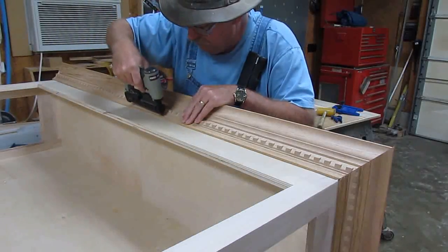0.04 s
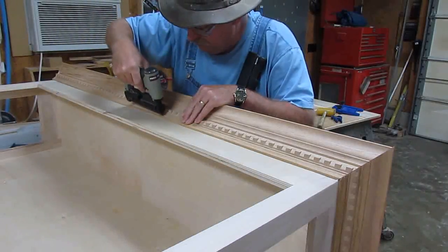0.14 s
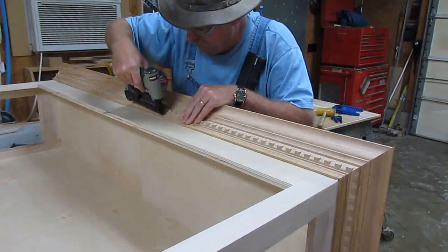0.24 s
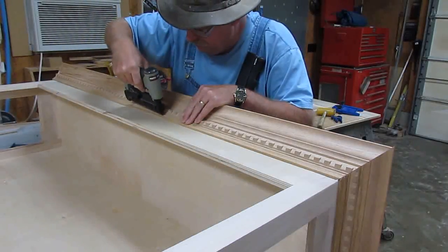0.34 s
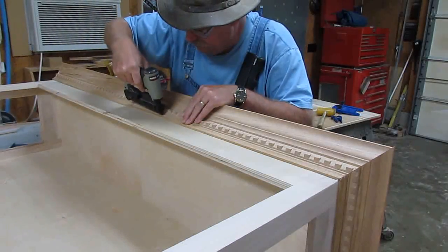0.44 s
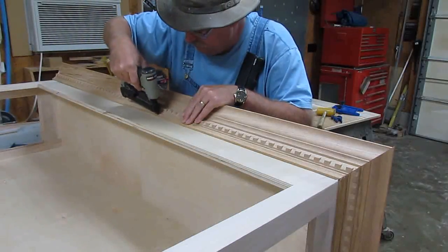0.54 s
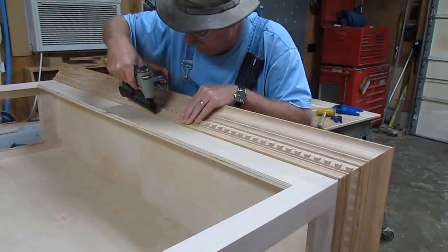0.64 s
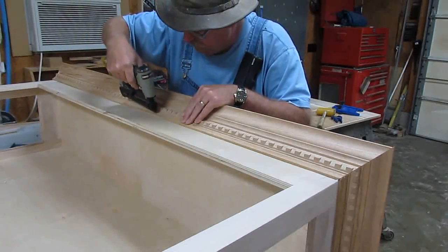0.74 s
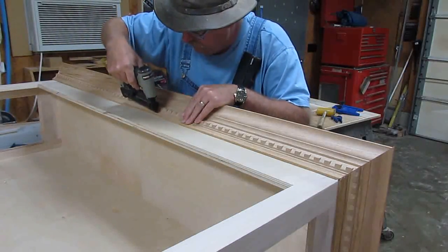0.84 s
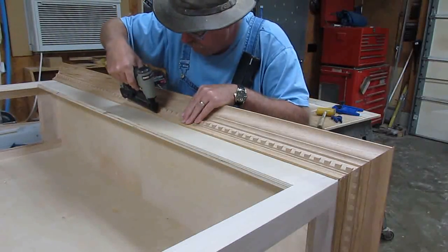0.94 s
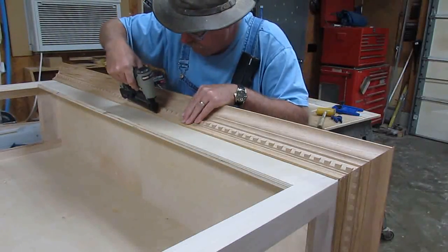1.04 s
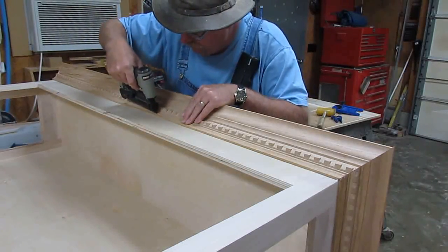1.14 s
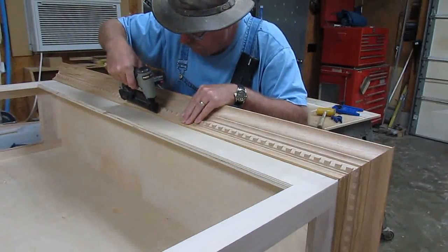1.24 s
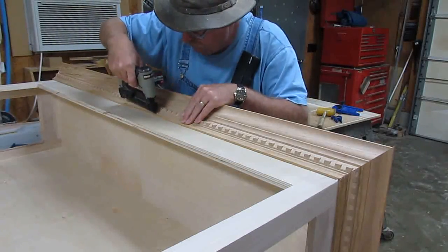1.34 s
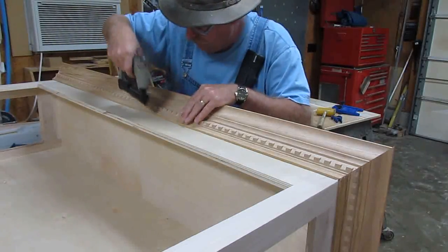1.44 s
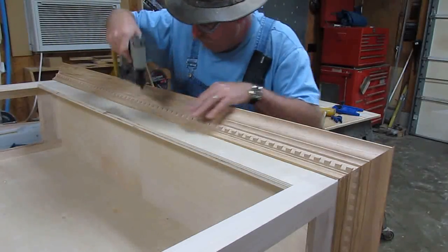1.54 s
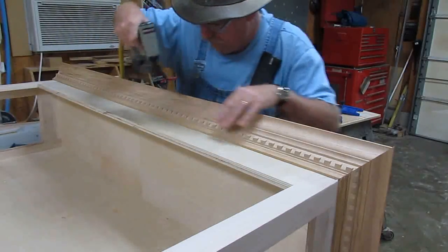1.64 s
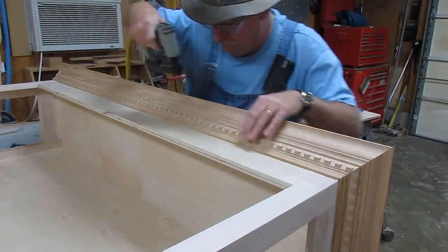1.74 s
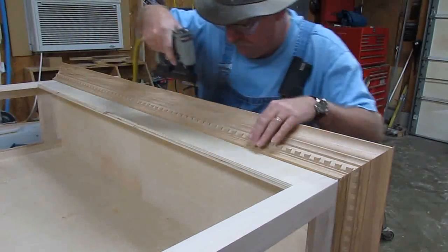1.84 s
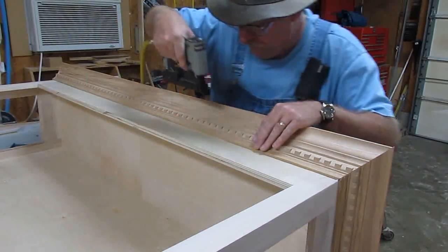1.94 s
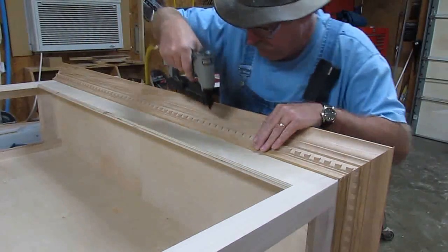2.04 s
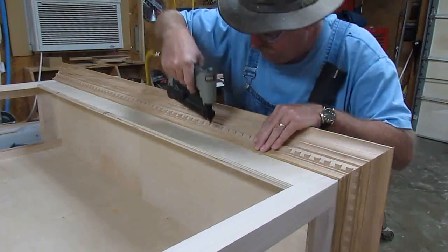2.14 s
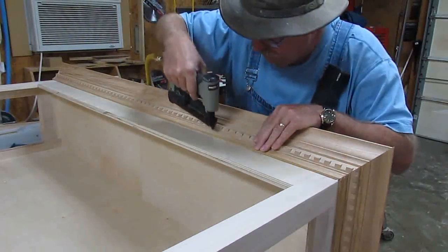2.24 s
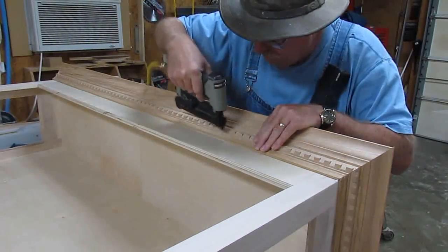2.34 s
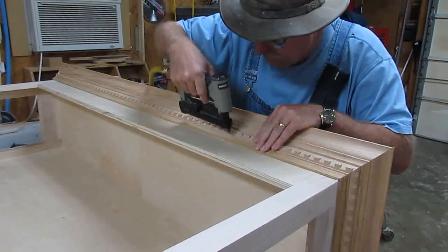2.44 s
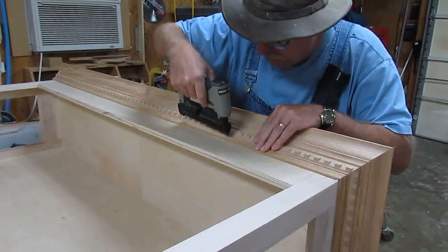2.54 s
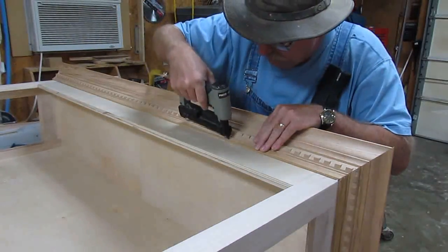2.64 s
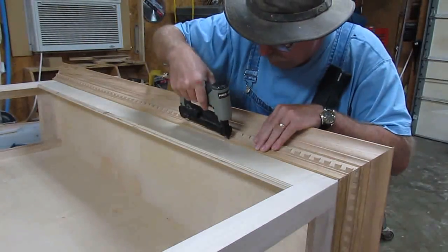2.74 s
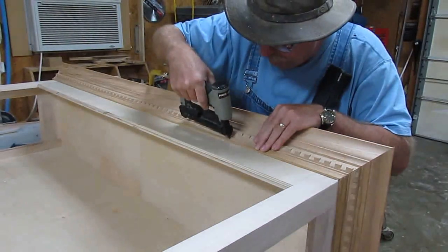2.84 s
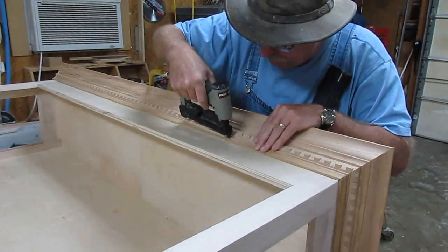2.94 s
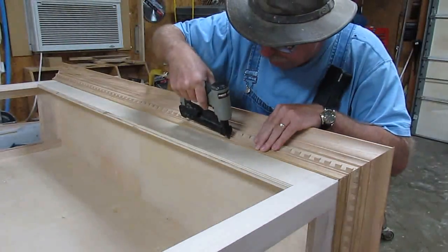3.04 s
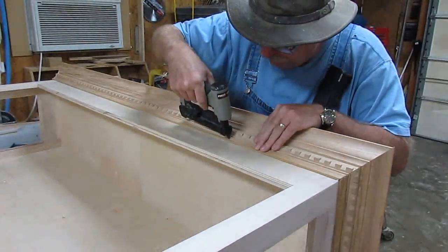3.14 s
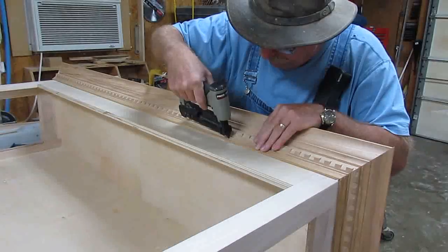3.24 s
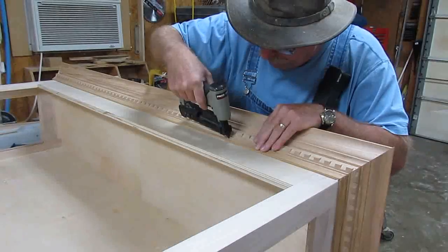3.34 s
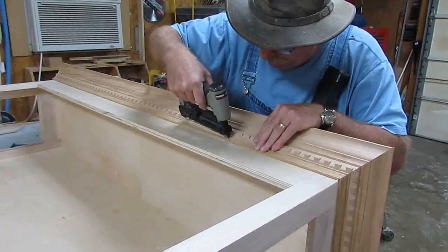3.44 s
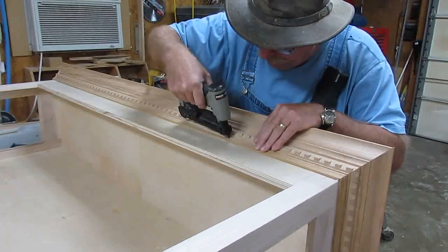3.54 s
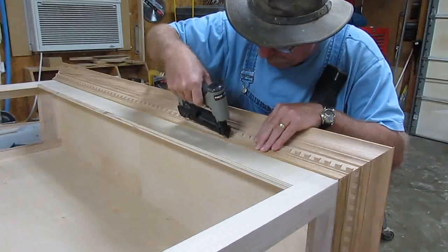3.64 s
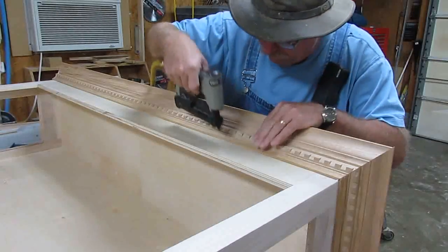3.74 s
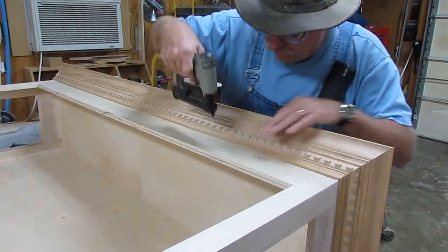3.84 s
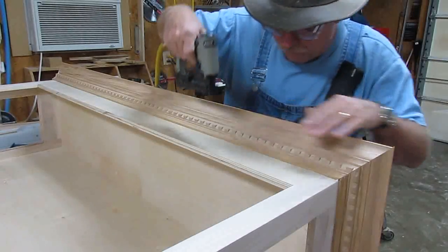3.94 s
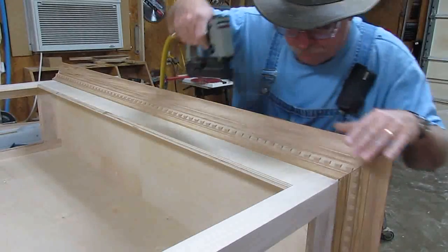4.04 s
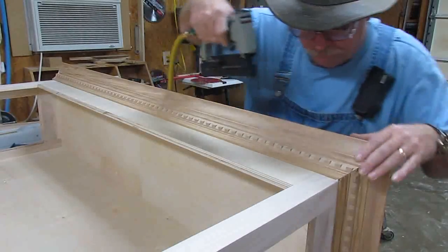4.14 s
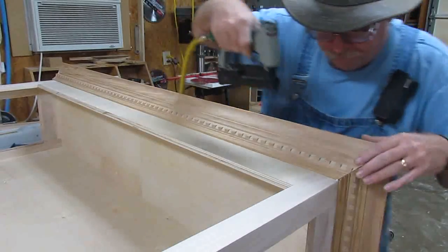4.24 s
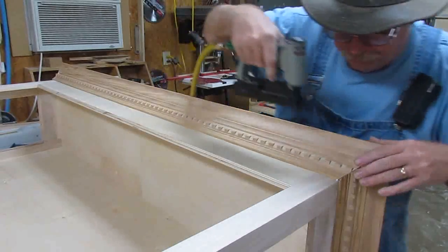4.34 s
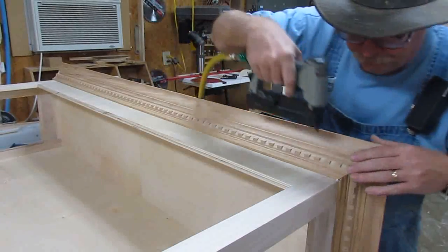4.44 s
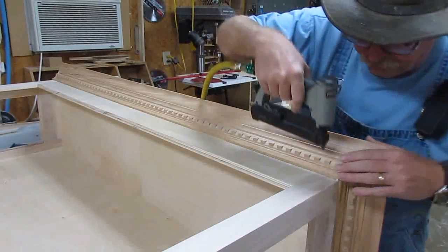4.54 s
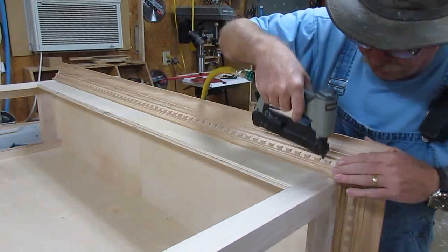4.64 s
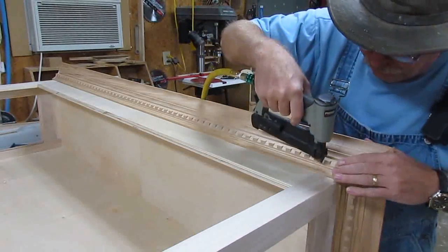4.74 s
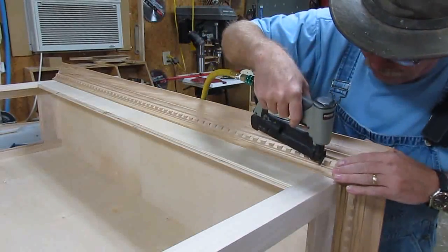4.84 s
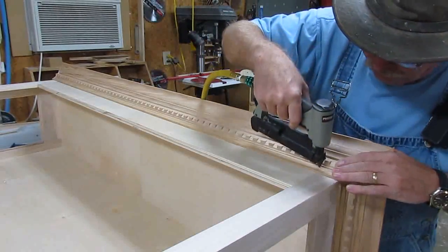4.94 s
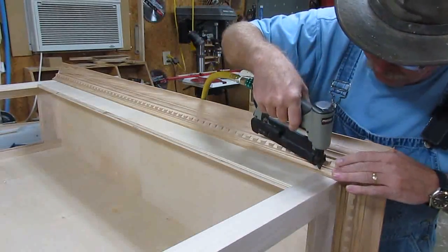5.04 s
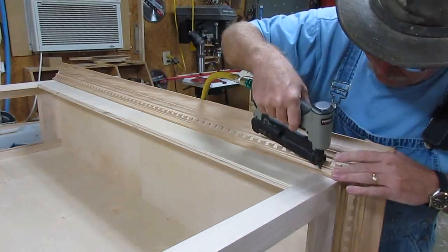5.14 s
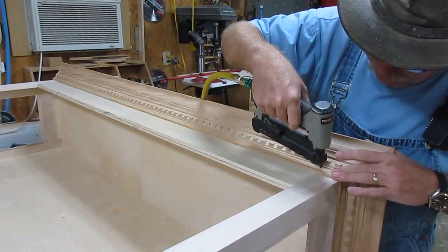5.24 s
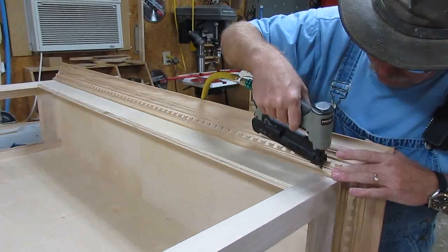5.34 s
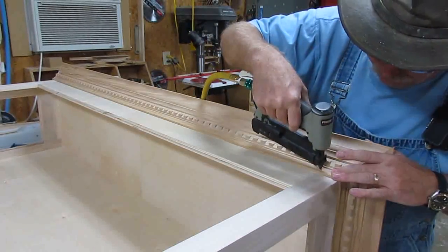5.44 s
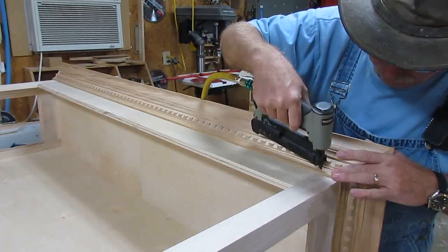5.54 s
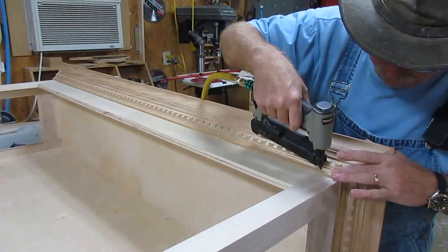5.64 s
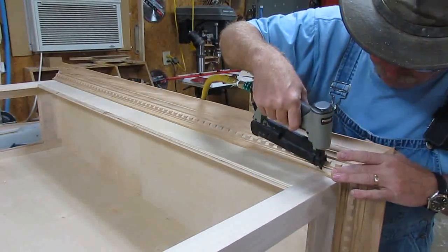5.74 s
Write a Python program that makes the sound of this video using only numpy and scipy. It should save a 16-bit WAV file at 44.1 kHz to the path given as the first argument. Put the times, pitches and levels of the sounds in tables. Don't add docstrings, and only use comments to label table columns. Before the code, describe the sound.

A compressed-air pin nailer fires three sharp, clanking shots into a hollow wooden cabinet, with scrapes, knocks and hand sweeps in an echoing workshop.

```python
import sys
import numpy as np
from scipy import signal
from scipy.fft import rfft, irfft
from scipy.io import wavfile
from scipy.ndimage import uniform_filter1d

SR = 44100
rng = np.random.default_rng(int(sys.argv[2]) if len(sys.argv) > 2 else 0)


def int16_out(signal):
    q = np.round(np.clip(np.atleast_2d(signal).T, -1, 1) * 32767)
    wavfile.write(sys.argv[1], SR, q.astype(np.int16))


def volts_from_db(level):
    exponent = np.asarray(level, float) / 20
    return 10 ** exponent


N = 255320

# [f/Hz, level/dB]
FLOOR_TONE = [(15, -46), (25, -15.5), (70, 2), (229, 0.5), (439, -4.5), (1160, -6), (1290, -10),
              (1740, -8.5), (2350, -12), (7310, -15.5), (12900, -22.5), (14800, -32.5), (16000, -49)]
# [f/Hz, level/dB rms]
VENT_WHINE = [(1557, -78.5)]
# [f/Hz, t60/s]
SHOP_T60 = [(100, 0.71), (260, .73), (700, 0.75), (1840, 0.75), (4850, 0.73), (9000, 0.49), (12800, 0.42),
            (16000, 0.9)]
# [f/Hz, level/dB]
SHOP_TONE = [(60, 4.5), (250, 7), (1000, 0), (4000, 6), (8000, -1), (15000, -0.5)]
# [f/Hz, likeness/0..1]
DIFFUSE = [(25, .5), (60, 1), (150, 0.62), (500, 0.54), (1500, 0.46), (4000, .15), (12000, 0.037)]
# [t/s, level/dB, tilt/steps of 6 dB off the part below 3 kHz, held to
SWEEPS = [
    [(0.64, -61, 0.1), (0.674, -72, 4), (0.714, -57, 6), (1.094, -70, 2), (1.106, -85, 5), (1.11, -81, 2)],
    [(1.76, -67, 6), (1.786, -75, 1), (1.796, -51.5, 4.5), (1.824, -57, 6), (1.938, -59.5, 7),
     (1.99, -44, 1.7), (2.148, -41.5, 0.3), (2.296, -55, 0.1), (2.478, -59.5, 3), (2.528, -76, 0.1),
     (2.56, -96, 9)],
    [(2.63, -83, 6), (2.698, -78, 4), (2.75, -63.5, 0.5), (2.816, -61, 9), (2.87, -78, -5.5)],
    [(3.92, -62, 5.8), (4.062, -69.5, -1.3), (4.122, -59.5, -2), (4.156, -75, 7), (4.23, -58, 9),
     (4.266, -63, 1), (4.368, -45, 0), (4.45, -40.5, 0.16), (4.56, -61.5, -2.16), (4.782, -68, -0.1),
     (4.814, -65, -1.6), (5.032, -67, -0.5), (5.042, -80, 1.7), (5.15, -82.5, 1.7)],
]
# [f/Hz, level/dB per Hz]
SWEEP_TONE = [(290, -33.5), (500, -28), (901, -8.5), (1350, -9), (3190, -4.5), (6450, -5), (12700, -16),
              (14400, -20), (15500, -54)]
# [t/s, level/dB, squeak of the tip above that/dB]
DRAGS = [
    [(0.05, -78, 1), (0.072, -51.5, -28), (0.104, -86, -17), (0.128, -60, -29), (0.288, -71, -7),
     (0.304, -60.5, -25), (0.32, -69, -8), (0.37, -57.5, -6.5)],
    [(0.37, -57, -3.5), (0.388, -48, -7.5), (0.43, -45, -13), (0.47, -57, -10)],
    [(0.47, -52.5, -12.5), (0.502, -53, 0), (0.592, -60.5, -4.5), (0.636, -51.5, 3.5), (0.652, -53, -8.5),
     (0.716, -64.5, -6.5), (0.75, -62.5, -4.5)],
    [(0.75, -61, -9), (0.808, -70, -2.5), (0.82, -54.5, -11), (0.844, -58, -10.5), (0.888, -60, -7),
     (0.898, -60, -19.5), (0.926, -64.5, -2), (1.11, -63, -10.5)],
]
# [f/Hz, level/dB per Hz]
DRAG_TONE = [(300, -15), (700, -6), (1000, 0), (1600, -1), (2100, -13), (5000, -21), (14000, -35)]
# [f/Hz, level/dB per Hz]
TIP_TONE = [(1200, -22.5), (2000, -4), (2500, 0), (3200, -4), (4500, -8), (14000, -23)]
# [t/s, level/dB, best-struck f/Hz,
# spread/octaves]
KNOCKS = [(0.063, -42, 248, 2.2), (0.096, -37.5, 200, 1.1), (.135, -33.5, 580, .22),
          (0.164, -43, 200, 0.91), (.205, -45, 243, 0.98), (0.446, -44.5, 88, 0.41),
          (.555, -46.5, 69, 0.66), (.53, -49.5, 326, .6), (.61, -47.5, 290, 0.46),
          (0.683, -47.5, 287, 0.91), (.818, -44.5, 130, 1.3), (.845, -44.5, 240, 0.83),
          (1.126, -38.5, 40.7, .7), (1.130, -26.5, 750, 1.3), (1.138, -33.5, 226, 0.62),
          (1.267, -42.5, 178.5, 1.1), (2.582, -44, 303, 1.23), (2.626, -50, 199, 0.93),
          (2.682, -43, 95, 0.75), (2.890, -45, 500, 1.9), (2.905, -31, 230, .6), (2.958, -42, 102.6, .9),
          (3.245, -51, 90.5, .6), (3.445, -39, 44.95, 0.77), (3.446, -29.5, 325, 0.96),
          (3.547, -32, 333, .6), (3.59, -27.5, 327, 0.49), (3.986, -50, 282, 1.8), (4.081, -47.5, 100, 1.1),
          (4.646, -50.5, 200, 1.38), (4.675, -50.5, 222, 0.83), (4.718, -45, 95.6, 0.37),
          (5.298, -41, 500, 2.15), (5.307, -33, 191, 0.71), (5.335, -36, 110, .9), (5.37, -45, 95, 0.5),
          (5.596, -33, 236.7, 1), (5.735, -37, 250, 1.1)]
# [f/Hz, level/dB, t60/s]
PANEL_MODES = [(33.18, -9.5, .1), (52, -22, 0.36), (94.6, -5, .22), (110, -7.5, .2), (144.4, -2, 0.16),
               (190.2, -9.5, .25), (215.8, -5.5, .3), (244, -5.5, 0.18), (259.8, -2.5, 0.11),
               (290, -4.5, 0.14), (341.1, -5, 0.17), (406.8, -10.5, 0.16), (490.4, -9, .2), (580, -5, 0.14),
               (682, -6.5, .15), (732, -8.5, 0.26), (860.7, -3.5, 0.087), (1147, -2.5, 0.052),
               (1260, -6, 0.027), (1620, -14, .06), (2050, -13, .05), (2650, -13, .04)]
# [t/s, level/dB]
LEANS = [
    [(0.0, -66), (0.03, -66), (0.068, -34), (0.132, -32.5), (0.314, -45.5), (0.676, -42), (0.782, -46),
     (0.84, -41), (1.0, -49), (1.09, -50), (1.11, -44)],
    [(1.75, -63), (1.782, -78), (2.016, -76), (2.152, -75), (2.46, -49.5), (2.54, -78.5), (2.586, -39),
     (2.714, -39.5), (2.764, -51), (2.862, -58), (2.91, -38), (3.078, -46.5), (3.396, -50.5),
     (3.414, -70.5), (3.43, -52)],
    [(3.93, -76), (3.952, -84.5), (3.988, -44.5), (4.304, -54.5), (4.522, -77), (4.66, -49), (4.76, -52),
     (4.792, -71), (5.09, -56), (5.122, -55), (5.272, -61.5), (5.294, -45.5), (5.308, -38), (5.556, -54.5),
     (5.57, -56)],
]
# [t/s, air level/dB, metal level/dB, wood level/dB, decay/ms]
BLASTS = [(1.1243, -1.5, -8, -16, 3.4), (1.1298, 4.5, -3, -21, 1.5), (1.1332, -15, -19, -9, 3.0),
          (1.139, -11, -24, -31, 3.0), (3.4446, -9, -15, -6, 2.3), (3.445, 1.5, -56, -33, 3.0),
          (3.450, -10, -19.5, -22, 2.2), (3.452, -6.5, -11.5, -23, 4.4), (3.4757, -39.5, -35.5, -55.5, 3.4),
          (5.586, -10, -41, -36.5, 4.5), (5.589, -7.5, -30.5, -52, 6.2), (5.5931, -4, -20, -17.5, 3.3),
          (5.5991, -16, -9, -21.5, 4.0)]
# [t/s, level/dB]
RELEASES = [
    (1.2621, -2.5),
    (3.546, -2.5),
    (5.735, 0.),
]
# [delay t/s, air level/dB, metal level/dB, wood level/dB, decay/ms]
RESET = [
    (0., -15.5, -29, -38, 2.5),
    (.005, -15.5, -23.5, -27.5, 6.8),
    (.008, -24, -32, -44.5, 33),
    (0.0349, -6, -16, -36, 2.0),
    (0.041, -9, -18, -60.5, 5.0),
    (.047, -16, -29, -25.5, 6.0),
]
# [t/s, air level/dB, metal level/dB, wood level/dB, decay/ms]
TICKS = [
    (1.793, -57, -73, -81, 5.3),
    (2.5817, -75, -54, -41.5, 3),
    (2.891, -71.5, -51, -46, 5.1),
    (5.199, -48.5, -52, -77, 3.05),
    (5.202, -51.5, -59.5, -78, 2.9),
    (5.297, -77.5, -54.5, -45, 6.7),
]
# [f/Hz, level/dB per Hz]
AIR = [(300, -52), (1500, -35), (4000, -10.5), (6000, -3), (8300, 0), (11000, -3), (13500, -8),
       (16000, -15.5)]
# [f/Hz, level/dB per Hz]
METAL = [(150, -45.5), (600, -27.5), (1300, -2.5), (2500, -4), (3500, -2), (4800, -6), (8000, -17),
         (14000, -37)]
# [f/Hz, level/dB per Hz]
WOOD = [(40, -27), (120, -10), (300, -6), (750, -3.5), (1300, -4.5), (3000, -21.5), (8000, -47.5)]
# [f/Hz, width/Hz, level/dB]
HOUSING = [(2019, 70, -3), (3128, 60, 5), (3881, 65, 6.5), (5922, 90, -1), (7375, 150, -4)]
EDGES_HZ = 40 * 2 ** np.arange(0, 9.1, .5)


def rms_one(x):
    return x / np.sqrt(np.mean(x ** 2) + 1e-20)


def at_hz(points, hz):
    points = np.array(points)
    return np.interp(np.log(hz), np.log(points[:, 0]), points[:, 1])


def in_time(rows, column=1):
    rows = np.array(rows)
    return np.interp(np.arange(N) / SR, rows[:, 0], rows[:, column], left=-120, right=-120)


def colour(x, spectrum):
    hz = np.maximum(np.arange(N // 2 + 1) * SR / N, 1)
    return rms_one(irfft(rfft(x) * volts_from_db(at_hz(spectrum, hz)), N))


def stereo_noise(size):
    mid, side = rfft(rng.standard_normal((2, size)))
    hz = np.maximum(np.arange(len(mid)) * SR / size, 1)
    alike = np.clip(at_hz(DIFFUSE, hz), 0, 1)
    return irfft(np.sqrt(1 + alike) * mid + np.sqrt(1 - alike) * side * [[1], [-1]], size)


def band_of(x, low, high):
    return signal.sosfilt(signal.butter(2, [low, high], "band", fs=SR, output="sos"), x)


def grains(per_s, spread_db):
    sizes = volts_from_db(spread_db * np.minimum(rng.exponential(1, N), 4)) * rng.choice([-1, 1], N)
    return sizes * (rng.random(N) < per_s / SR)


def ring(x, hz, t60):
    radius, w = volts_from_db(-60 / (t60 * SR)), 2 * np.pi * hz / SR
    return signal.lfilter([0, np.sin(w)], [1, -2 * radius * np.cos(w), radius ** 2], x + 1e-18)


def pan(right_db):
    return volts_from_db(np.array([[-right_db], [right_db]]))


def floor():
    air = np.array([colour(x, FLOOR_TONE) for x in stereo_noise(N)])
    whine = sum(volts_from_db(db) * rms_one(ring(rng.standard_normal(N), hz, .3)) for hz, db in VENT_WHINE)
    return volts_from_db(-59) * pan(.5) * air + whine


def workshop(x, first_s=.006, build_s=0.0068):
    t, echo = np.arange(SR) / SR, 0
    whites = [stereo_noise(len(t)), stereo_noise(len(t))]
    for k, (low, high) in enumerate(zip(EDGES_HZ, EDGES_HZ[1:])):
        t60 = at_hz(SHOP_T60, np.sqrt(low * high))
        echo = echo + band_of(whites[k % 2], low, high) * volts_from_db(-60 * t / t60)
    echo = echo * (1 - np.exp(-np.maximum(t - first_s, 0) / build_s))
    echo = echo / np.sqrt(np.sum(echo ** 2) / 2)
    return signal.fftconvolve(x[None], echo, axes=1)[:, :N]


def sweeps():
    hiss = colour(grains(per_s=18000.0, spread_db=-1.5), SWEEP_TONE)
    low = signal.sosfilt(signal.butter(1, 3000, fs=SR, output="sos"), hiss)
    out = 0
    for rows in SWEEPS:
        tilt = np.clip(in_time(rows, column=2), -3, 3)
        out = out + volts_from_db(in_time(rows) - 3.5) * (hiss - low + low * volts_from_db(-6 * tilt))
    return out


def drag():
    clicks = grains(per_s=3000., spread_db=2.5)
    wood, tip = colour(clicks, DRAG_TONE), colour(clicks, TIP_TONE)
    out = 0
    for rows in DRAGS:
        squeak_db = np.clip(in_time(rows, column=2), -30, 12) - 6.0
        out = out + volts_from_db(in_time(rows) - 1.5) * (wood + tip * volts_from_db(squeak_db))
    return out


def cabinet(blows):
    uneven_db = rng.normal(0, 2.5, (len(KNOCKS), len(PANEL_MODES)))
    signs = rng.choice([-1, 1], uneven_db.shape)
    s, level_db, best_hz, octaves = np.array(KNOCKS).T
    lean = sum(volts_from_db(in_time(rows)) for rows in LEANS) * rms_one(grains(per_s=900., spread_db=2.5))
    out = np.zeros(N)
    for k, (hz, db, t60) in enumerate(PANEL_MODES):
        off_best_db = 5.52 * (np.log2(hz / best_hz) / octaves) ** 2
        clicks = np.zeros(N)
        clicks[(s * SR).astype(int)] = signs[:, k] * volts_from_db(level_db + uneven_db[:, k] - off_best_db)
        rumble = volts_from_db(-39.5) * min(hz / 80., 1) * lean / (1 + (hz / 500.0) ** 2)
        out += volts_from_db(db) * ring(clicks + rumble + volts_from_db(-47.5) * blows, hz, t60)
    return out


def blasts(rise_ms=0.72, shot_wet_db=(-15, -12, -8), reset_wet_db=(-7, -5, -5)):
    resets = []
    for s, db in RELEASES:
        for delay, air_db, metal_db, wood_db, decay_ms in RESET:
            resets.append((s + delay, air_db + db, metal_db + db, wood_db + db, decay_ms))
    direct, sent = np.full((2, 3, N), 1e-18)
    t = np.arange(SR // 2) / SR
    for rows, wet_db in ((BLASTS, shot_wet_db), (resets + TICKS, reset_wet_db)):
        to_room = volts_from_db(2 * np.array(wet_db))[:, None]
        for s, air_db, metal_db, wood_db, decay_ms in rows:
            at = round(s * SR)
            shape = (1 - np.exp(-1000 * t / rise_ms)) ** 2 * np.exp(-1000 * t / decay_ms)
            power = (volts_from_db(np.array([[air_db], [metal_db], [wood_db]])) * shape[:N - at]) ** 2
            direct[:, at:at + len(t)] += power
            sent[:, at:at + len(t)] += power * to_room
    return direct, sent


def shot_tail(power, first_s=0.0017, build_s=.008):
    whites, out = [stereo_noise(N), stereo_noise(N)], 0
    grow = np.exp(-1 / (build_s * SR))
    delayed = np.pad(power, ((0, 0), (round(first_s * SR), 0)))[:, :N]
    late = signal.lfilter([1 - grow], [1, -grow], delayed)
    centres = np.sqrt(EDGES_HZ[1:] * EDGES_HZ[:-1])
    share = np.array([volts_from_db(2 * at_hz(tone, centres)) * centres for tone in (AIR, METAL, WOOD)])
    share = share / share.sum(axis=1, keepdims=True)
    for k, (low, high, hz, part) in enumerate(zip(EDGES_HZ, EDGES_HZ[1:], centres, share.T)):
        keep = volts_from_db(-120 / (at_hz(SHOP_T60, hz) * SR))
        stored = signal.lfilter([1 - keep], [1, -keep], part @ late)
        band = band_of(whites[k % 2], low, high)
        out = out + volts_from_db(at_hz(SHOP_TONE, hz)) * np.sqrt(stored * SR / 2 / (high - low)) * band
    for hz, width, db in HOUSING:
        out = out + volts_from_db(db) * signal.lfilter(*signal.iirpeak(hz, hz / width, fs=SR), out)
    return out


def nailer(power, apart_db=(-5, -8, -14)):
    out = 0
    for p, tone, db in zip(power, (AIR, METAL, WOOD), apart_db):
        mid, side = (colour(x, tone) for x in rng.standard_normal((2, N)))
        out = out + np.sqrt(p) * (mid + volts_from_db(db) * side * [[1], [-1]])
    return out


def scene():
    power, sent = blasts()
    tool = nailer(power) + shot_tail(sent)
    box = cabinet(np.sqrt(power[2]) * rng.standard_normal(N))
    nose, hand = drag(), sweeps()
    direct = tool * pan(.3) + (box + nose) * pan(.8) + hand * pan(.9)
    return direct + workshop(volts_from_db(-9) * box + volts_from_db(-3) * nose + volts_from_db(-4) * hand) + floor()


def thin_top(x, from_hz=10500, below_db=11., quiet=2.5):
    hz, _, frames = signal.stft(x, SR, nperseg=1024)
    power = np.mean(np.abs(frames) ** 2, axis=0)
    middle = power[(hz > 3500) & (hz < 9000)].mean(axis=0)
    excess = uniform_filter1d(middle - quiet * np.percentile(middle, 10), size=3)
    smooth = uniform_filter1d(uniform_filter1d(power, size=3, axis=1), size=25, axis=0)
    band = smooth[12::25].repeat(25, axis=0)
    band = band[np.minimum(np.arange(len(hz)), len(band) - 1)]
    keep = (band > excess * volts_from_db(-2 * below_db)) | (hz[:, None] < from_hz)
    return signal.istft(frames * keep, SR, nperseg=1024)[1][:, :N]


def low_pass(x):
    return signal.sosfilt(signal.butter(12, 16200, fs=SR, output="sos"), x)


def record(dry):
    dulled = signal.sosfilt(signal.butter(6, 16800, fs=SR, output="sos"), dry)
    mix = np.clip(thin_top(dulled), -.99, .99)
    return low_pass(mix)


dry = scene()
out = record(dry)
int16_out(out)
```